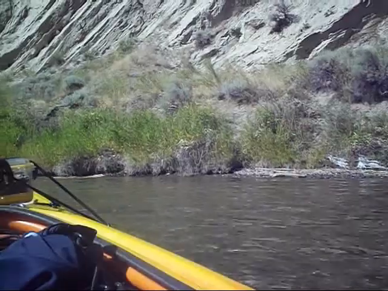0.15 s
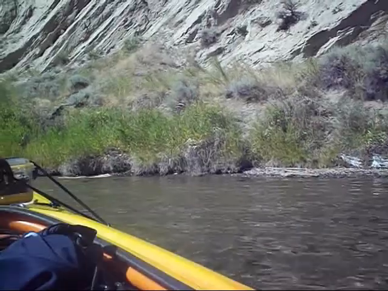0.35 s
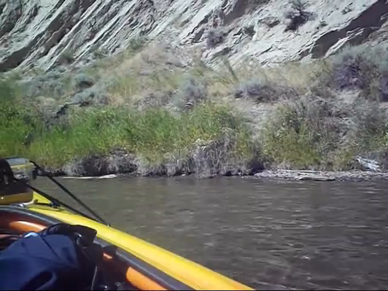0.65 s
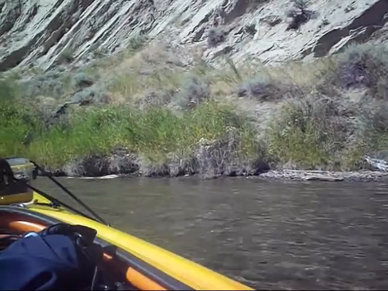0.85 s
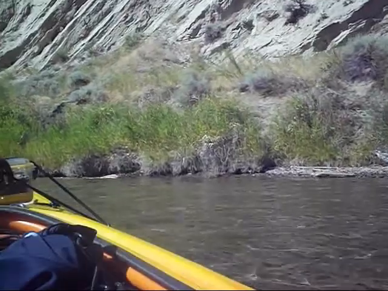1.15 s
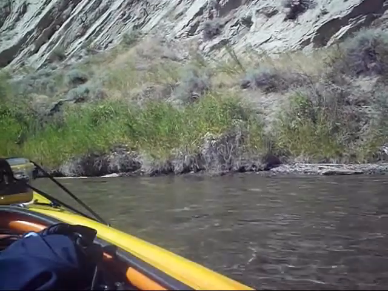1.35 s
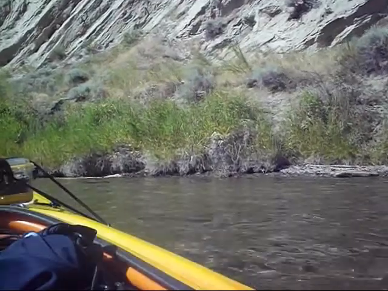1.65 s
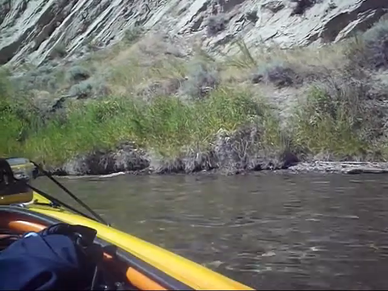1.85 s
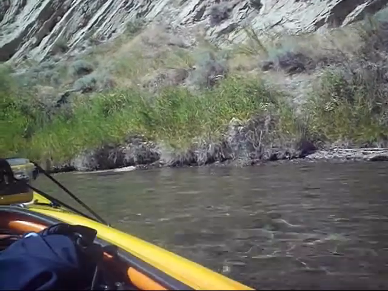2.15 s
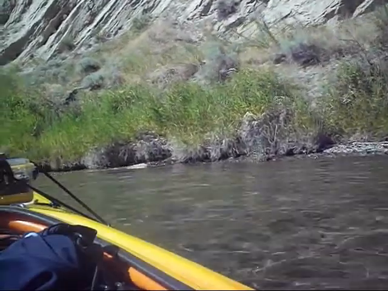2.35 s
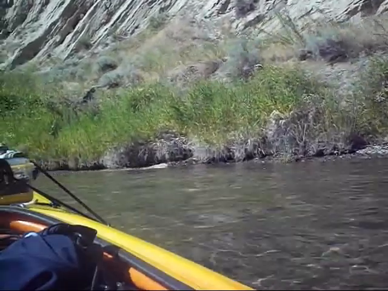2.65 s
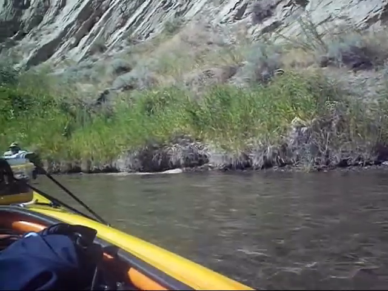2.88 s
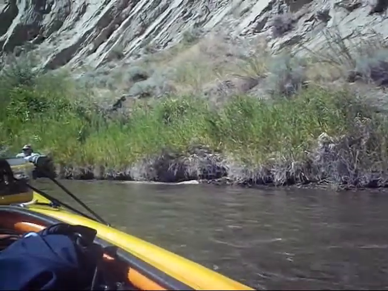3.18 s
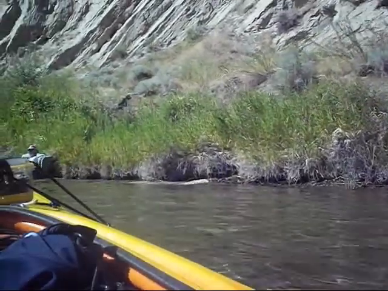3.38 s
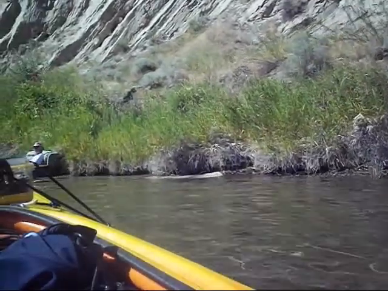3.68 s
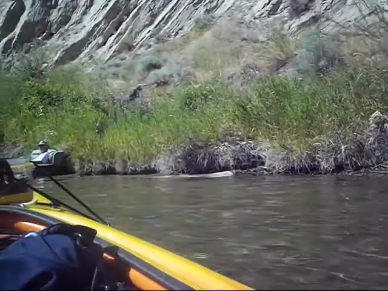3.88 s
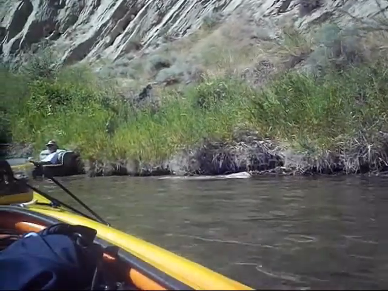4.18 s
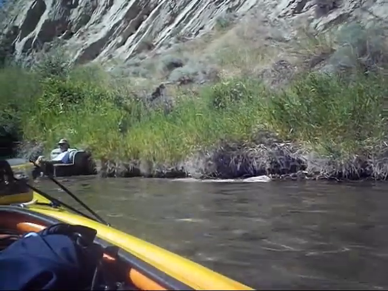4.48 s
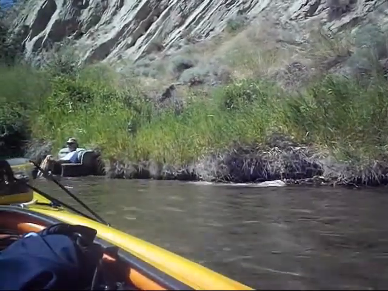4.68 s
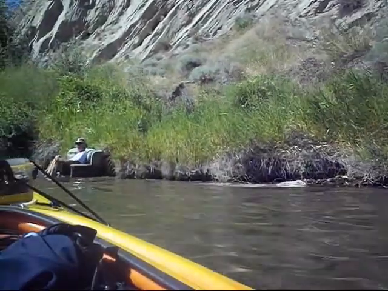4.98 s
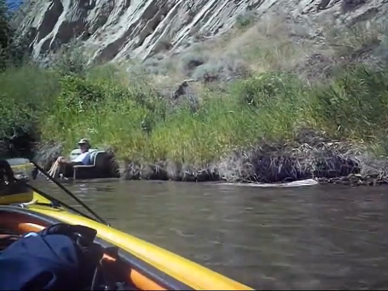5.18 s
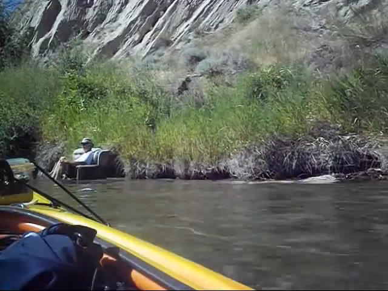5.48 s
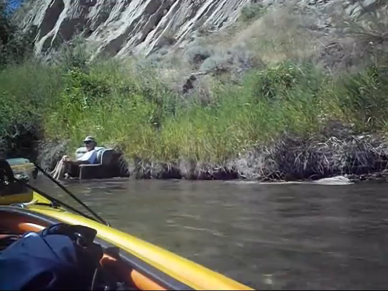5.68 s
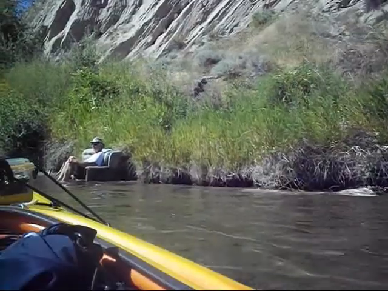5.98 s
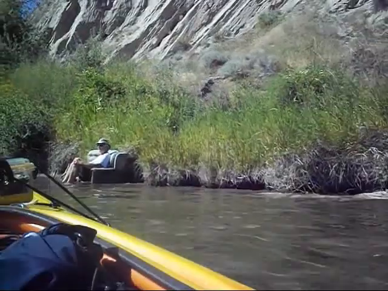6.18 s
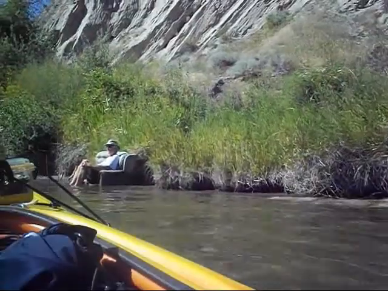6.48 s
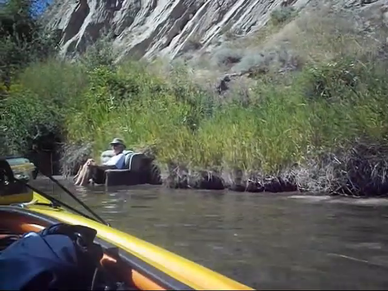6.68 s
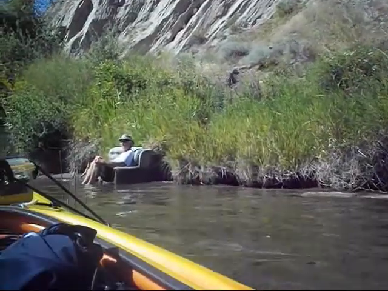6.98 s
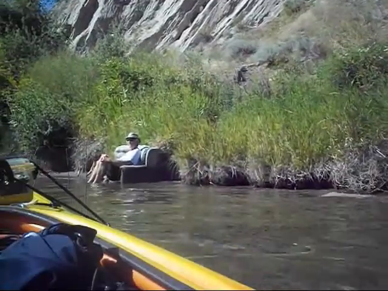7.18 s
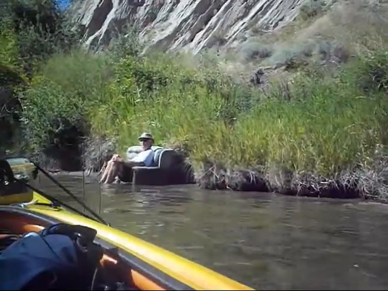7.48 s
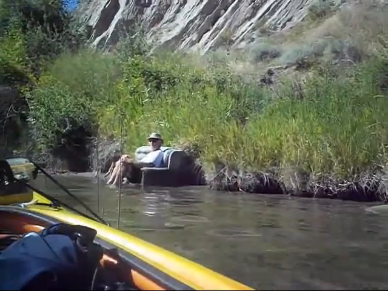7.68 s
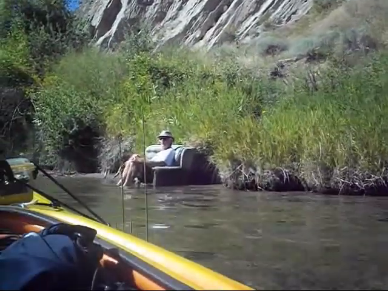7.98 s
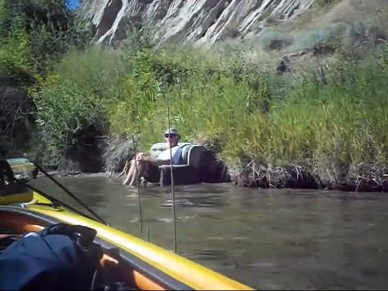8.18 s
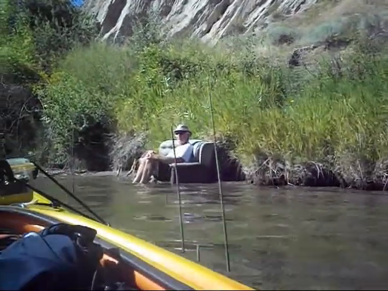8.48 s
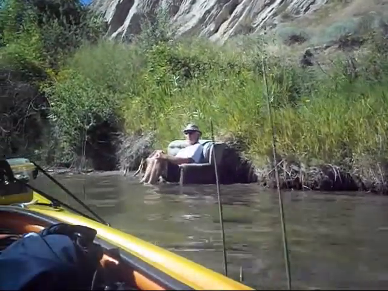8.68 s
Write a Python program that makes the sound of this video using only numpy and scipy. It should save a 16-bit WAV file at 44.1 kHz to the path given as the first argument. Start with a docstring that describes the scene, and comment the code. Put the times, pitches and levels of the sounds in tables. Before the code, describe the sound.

Heard close from the deck of a drifting kayak, fine fizzy trickling and small bubble notes run over light wind rumble. Before the middle comes a single sharp metallic clack with a short ring. Afterwards the water sounds duller, gurgling and knocking in the hollow hull, with the strongest boom shortly before the end. The small microphone catches little treble.

```python
"""Kayak on a calm river

Heard from a small camera on the deck of a drifting kayak. Wind rumbles on the microphone, water
trickles alongside in tiny bubbles, and wavelets slap and boom in the hollow hull underneath. Once a
metal fitting is struck and pings, and the trickle gives way to a duller wash. The camera's sound is
narrow-band; it ticks faintly at first, and later its left channel runs slightly late."""
import sys
import numpy as np
from scipy import signal
from scipy.fft import rfft, irfft, next_fast_len
from scipy.io import wavfile
from scipy.ndimage import uniform_filter1d, map_coordinates

SR = 44100
rng = np.random.default_rng(int(sys.argv[2]) if len(sys.argv) > 2 else 0)


def master_out(mix):
    """Clip the mix to full scale and print it as 16-bit PCM to the path in sys.argv[1]."""
    frames = np.transpose(np.atleast_2d(mix))
    ceiling = np.clip(frames, -1, 1)
    pcm = np.round(ceiling * 32767).astype(np.int16)
    wavfile.write(sys.argv[1], SR, pcm)


N = 390279
TIME = np.arange(N) / SR


def amp(db):
    """Decibels to gain."""
    return 10 ** (np.asarray(db) / 20)


def unit(x):
    """x scaled to rms 1."""
    return x / np.sqrt(np.mean(x ** 2) + 1e-20)


def along(points, hz):
    """Interpolate (Hz, value) points on a log frequency axis."""
    freqs, values = np.transpose(points)
    return np.interp(np.log(hz + 1), np.log(freqs + 1), values)


def curve(points):
    """Interpolate (seconds, value) points at every sample."""
    return np.interp(TIME, *np.transpose(points))


def wobble(rate):
    """A smooth random curve with rate knots a second."""
    return map_coordinates(rng.standard_normal(int(N * rate / SR) + 4), [TIME * rate])


def filtered(x, response):
    """x through a complex frequency response."""
    n = x.shape[-1]
    padded = next_fast_len(n + 8192)
    return irfft(rfft(x, padded) * response(np.fft.rfftfreq(padded, 1 / SR)), padded)[..., :n]


def resonate(x, modes):
    """x through damped resonances of alternating sign."""
    def response(f):
        return sum((-1) ** k * amp(db) * 1j * f * width / (hz * hz - f * f + 1j * f * width)
                   for k, (hz, width, db) in enumerate(modes))
    return filtered(x, response)


def rush(spectrum, patchy_db):
    """Coloured noise of rms 1 with patches of random gain in time and pitch."""
    cells = signal.stft(rng.standard_normal(N), nperseg=512)[2]
    patches = uniform_filter1d(rng.standard_normal(cells.shape), size=5, axis=0)
    patches = unit(uniform_filter1d(patches, size=6, axis=1))
    noise = signal.istft(cells * amp(patchy_db * patches), nperseg=512)[1][:N]
    return unit(filtered(noise, lambda hz: amp(along(spectrum, hz))))


def add(track, start_s, sound):
    """Mix a sound into a track."""
    part = track[max(round(start_s * SR), 0):][:len(sound)]
    part += sound[:len(part)]


def bubble(t, hz, cycles, glide):
    """A bubble swells, rings for some cycles and rises in pitch as it nears the surface."""
    age = t * hz / cycles
    envelope = (1 - np.exp(-4 * age)) * np.exp(-age)
    return envelope * np.sin(2 * np.pi * hz * t * (1 + glide * np.tanh(age / 2)))


def bubbles(count, low_hz, high_hz, cycles, spread_db):
    """A cloud of bubbles of random size, rms 1."""
    when, pitch, size = rng.random((count, 3)).T[:, :, None]
    t = np.arange(SR // 30) / SR
    strength = amp(-spread_db * np.log(1 - .97 * size))
    grains = strength * bubble(t, low_hz * (high_hz / low_hz) ** pitch, cycles, glide=0.069)
    samples = (when * N).astype(int) + np.arange(len(t))
    return unit(np.bincount(samples.ravel(), grains.ravel(), N)[:N])


def slap(modes, contact_s):
    """A brief noisy push rings (Hz, width in Hz, dB) modes; the first 20 ms have rms 1."""
    t = np.arange(SR // 8) / SR
    push = rng.standard_normal(len(t)) * t / contact_s * np.exp(-t / contact_s)
    ring = resonate(push, modes)
    return ring / np.sqrt(np.mean(ring[:SR // 50] ** 2))


# Gusts across the deck. Each row: time in seconds, relative level in dB.
GUST_LEVELS = [(0.0, -60), (0.37, -55.5), (1.21, -62.5), (3.75, -53), (3.87, -58.5), (4.93, -56),
               (5.44, -62), (7.54, -60), (7.84, -56), (8.85, -65.5)]
# Wind at the microphone. Each row: frequency in Hz, relative level in dB.
WIND_SPECTRUM = [(8, -3), (20, 2), (35, 1), (55, -18.5), (120, -29), (400, -54.5)]


def wind(surge_db):
    """Gusts rumble right on the microphone."""
    return amp(curve(GUST_LEVELS) + 4 + surge_db) * rush(WIND_SPECTRUM, patchy_db=0.46)


# The drone below the deck. Each row: frequency in Hz, relative level in dB.
DRONE_SPECTRUM = [(25, -25.5), (45, -4), (65, -1), (105, -6.5), (150, -11.5), (230, -17.5), (400, -25),
                  (900, -43)]


def drone(gain):
    """The current drones low in the hull."""
    return gain * rush(DRONE_SPECTRUM, patchy_db=-0.1)


# Water against the hull. Each row: frequency in Hz, relative level in dB.
WASH_SPECTRUM = [(60, -21.5), (200, -7), (380, -8.5), (510, -9), (590, -5.5), (640, -2), (730, -7.5),
                 (870, -11.5), (1050, -14), (1600, -15.5), (2350, -20.5), (2800, -17.5), (3300, -21.5),
                 (4400, -31.5)]
# Modes of the air in the hull. Each row: frequency in Hz, width in Hz, relative level in dB.
CAVITY_MODES = [(382, 120, -14), (642.5, 31.8, 3), (720, 97, -6.5)]


def wash(gain, stir, hollowness):
    """Water washes along the hull, rings the air inside and gurgles with bubbles."""
    water = gain * amp(.6 * wobble(14)) * rush(WASH_SPECTRUM, patchy_db=2.0)
    hollow = gain * hollowness * amp(-2) * unit(resonate(rng.standard_normal(N), CAVITY_MODES))
    gurgle_gain = np.hypot(amp(-16) * gain, amp(-5.5) * stir)
    gurgle = gurgle_gain * bubbles(count=300, low_hz=590, high_hz=1926, cycles=5, spread_db=3.5)
    return water + hollow + gurgle


# Fizz at the waterline. Each row: frequency in Hz, relative level in dB.
FIZZ_SPECTRUM = [(700, -36.5), (1400, -6), (1900, -3.5), (2250, 0.6), (3000, 0.5), (3500, 3), (4200, -11)]


def trickle(gain):
    """Tiny bubbles fizz and ring close alongside."""
    fizz = amp(2.0 + wobble(16)) * rush(FIZZ_SPECTRUM, patchy_db=3.0)
    notes = amp(-2.5) * bubbles(count=800, low_hz=2047, high_hz=3702, cycles=6.3, spread_db=3.0)
    return gain * (fizz + notes)


# Larger waves reaching the boat. Each row: start in seconds, strength in dB, rumble in dB,
# decay time in seconds.
LARGE_WAVES = [(4.29, -56, -58.5, .27), (5.06, -52, -43, .16), (6.56, -54, -56, .2),
               (7.93, -50.5, -44, .14)]


def churn(rise_s):
    """Gains of the stirred water and the hull's rumble: each wave raises them, then they settle."""
    stir, rumble, t = np.zeros(N), np.zeros(N), np.arange(2 * SR) / SR
    for start_s, db, rumble_db, decay_s in LARGE_WAVES:
        envelope = (1 - np.exp(-t / rise_s)) * np.exp(-t / decay_s)
        add(stir, start_s, amp(db) * envelope)
        add(rumble, start_s, amp(rumble_db) * envelope)
    return stir, rumble


# The trickle alongside while it runs. Each row: time in seconds, relative level in dB.
TRICKLE_LEVELS = [(0.0, -64), (0.29, -65), (0.62, -60.5), (1.38, -64.5), (1.59, -62), (2.16, -63),
                  (2.61, -65), (2.88, -64.5), (3.07, -60), (3.21, -60.5), (3.39, -61.5), (3.5, -63.5)]
DULL_FROM_S, DULL_FADE_S = 3.57, .35  # the trickle gives way to the duller wash


def river():
    """Wind and water around the microphone; some wash and fizz differ between left and right."""
    dullness = np.clip((TIME - DULL_FROM_S) / DULL_FADE_S, 0, 1)

    def fade(before_db, after_db):
        return amp(before_db + (after_db - before_db) * dullness)

    stir, rumble = churn(rise_s=0.015)
    drone_gain = np.hypot(fade(before_db=-57.5, after_db=-55), rumble)
    wash_gain = np.hypot(fade(before_db=-61, after_db=-56), stir)
    trickle_gain = np.hypot(fade(before_db=curve(TRICKLE_LEVELS), after_db=-74), amp(-9) * stir)
    surge_db = 1.1 * wobble(7.8)
    mid = wind(surge_db) + drone(drone_gain * amp(surge_db))
    mid += wash(wash_gain, stir, hollowness=dullness) + trickle(trickle_gain)
    side = wash_gain * amp(-18) * rush(WASH_SPECTRUM, patchy_db=2.5)
    side += trickle_gain * amp(-13) * rush(FIZZ_SPECTRUM, patchy_db=3)
    return np.array([mid + side, mid - side])


# Bubbles nearest the microphone. Each row: start in seconds, level in dB, pitch in Hz,
# relative splash level in dB.
NEAR_BUBBLES = [(0.3031, -44, 2160, -1), (0.4072, -43, 2300, 3), (0.4539, -37.5, 2280, 1.5),
                (0.5185, -45, 2920, -2), (0.7826, -44.5, 3440, 8.5), (0.8845, -41, 3460, 5),
                (1.3074, -44.5, 2540, 4), (1.4394, -43, 2820, -8), (1.5707, -44, 3410, 6),
                (2.0892, -39.5, 3536, 2), (2.2363, -44, 3380, -8), (2.3306, -49.5, 2700, 7),
                (2.5228, -39, 3240, 2), (2.988, -46, 2500, 3), (3.0746, -44, 3000, 1),
                (4.2123, -41.5, 2930, 2), (4.57, -38.5, 2760, -6), (4.8923, -36, 2760, 6),
                (5.219, -39.5, 2420, 7), (5.6347, -38.5, 2820, 6)]


def plips():
    """Single bubbles stand out of the trickle as round notes, each with a tiny splash."""
    out, t = np.zeros(N), np.arange(SR // 8) / SR
    for start_s, db, hz, splash_db in NEAR_BUBBLES:
        splash = amp(splash_db - 20) * slap([(2430, 1700, 0), (3560, 1400, 0)], contact_s=0.0013)
        note = bubble(t, hz, cycles=12, glide=.02)
        add(out, start_s - .001, amp(db) * (note + splash))
    return out


# Air pockets under the boat. Each row: start in seconds, relative level in dB, pitch in Hz.
AIR_POCKETS = [(2.162, -42.5, 740), (2.628, -48, 840), (4.356, -36.5, 479), (4.693, -29.5, 702),
               (5.093, -35.5, 682), (5.106, -30, 690)]


def gulps():
    """Large trapped bubbles ring briefly under the hull."""
    out, t = np.zeros(N), np.arange(SR // 8) / SR
    for start_s, db, hz in AIR_POCKETS:
        add(out, start_s - .001, amp(db + 0.5) * bubble(t, hz, cycles=4.8, glide=0.026))
    return out


# Modes of a metal fitting on the boat, the dead ones first. Each row: frequency in Hz,
# relative level in dB, seconds to fall by 60 dB.
FITTING_MODES = [(495, -37.5, .05), (698, -33.5, .06), (1040, -38, .03), (1150, -41.5, .03),
                 (1640, -20.5, 0.018), (1970, -15.5, 0.013), (2280, -20.5, .009), (2970, -21.5, .009),
                 (1740, -37.5, .33), (2390, -53.5, 0.53), (2638, -22, 0.33)]


def ping(start_s):
    """A hard clack on the fitting, which rings on in a few clear tones."""
    out, t = np.zeros(N), np.arange(SR // 2) / SR
    ring = sum((-1) ** k * amp(db - 60 * t / t60) * np.sin(2 * np.pi * hz * t)
               for k, (hz, db, t60) in enumerate(FITTING_MODES))
    attack = 1 - np.exp(-t / 0.00028)
    clack = slap([(273, 270, -10), (1950, 340, -2.5), (3200, 410, -3.5)], contact_s=0.0013)
    add(out, start_s, amp(2.0) * ring * attack)
    add(out, start_s, amp(-31.0) * clack)
    return out


# Swells passing under the microphone. Each row: start in seconds, peak level of the note in dB,
# final pitch in Hz, rise time in seconds.
SWELLS = [(2.167, -49.5, 101.5, 0.033), (2.504, -45.5, 83.5, 0.011), (3.733, -32.5, 28.2, 0.011),
          (4.667, -39.5, 52, 0.022), (5.039, -35, 78.2, 0.023), (5.086, -35, 64.3, 0.046),
          (5.865, -43.5, 65.4, 0.025), (6.67, -48.5, 66, 0.035), (7.936, -20.8, 85, 0.0079),
          (7.961, -24.5, 60.5, 0.0097), (7.992, -34.5, 88, .014), (8.11, -45, 62, .04)]
# Water heaving against the hull. Each row: frequency in Hz, width in Hz, relative level in dB.
SLOSH_MODES = [(60, 74, 2), (212, 160, -7.5), (374, 66, -7)]


def booms():
    """The whole hull flexes under a swell; its low note sags as the water loads it."""
    out, t = np.zeros(N), np.arange(SR // 2) / SR
    for start_s, db, hz, rise_s in SWELLS:
        sagging_hz = hz * (1 + 0.27 * np.exp(-t / rise_s))
        note = -np.sin(2 * np.pi * np.cumsum(sagging_hz) / SR)
        slosh = amp(-13) * unit(resonate(rng.standard_normal(len(t)), SLOSH_MODES))
        envelope = t / rise_s * np.exp(1 - t / rise_s)
        add(out, start_s, amp(db) * envelope * (note + slosh))
    return out


# Resonances of the hull's plastic skin and of the spray thrown off it.
# Each row: frequency in Hz, width in Hz, relative level in dB.
SKIN_MODES = [(1080, 130, -11.5), (1278, 66, 0), (1608, 110, -1.5), (2100, 170, -12.5)]
SPRAY_MODES = [(2740, 330, 0.62), (3200, 550, -0.55), (4400, 300, 0)]


def wavelet(knock_db, hardness_db):
    """A wavelet knocks the air cavity; the harder it is, the more it smacks the skin and sprays."""
    contact_s = .0027 * 2 ** (hardness_db / 25.5)  # harder wavelets scrape along the skin for longer
    knock = amp(-3.5) * slap(CAVITY_MODES, contact_s)
    smack = amp(-0.5) * slap(SKIN_MODES, contact_s)
    spray = amp(-5.5) * slap(SPRAY_MODES, 1.4 * contact_s)
    return amp(knock_db) * (knock + amp(hardness_db) * (smack + spray))


def ripples(count):
    """A few small wavelets follow each large wave at uneven gaps, ever weaker."""
    out = np.zeros(N)
    for start_s, db, _, decay_s in LARGE_WAVES:
        for age in 1.5 * (np.arange(count) + rng.random(count)) / count:
            add(out, start_s + age * decay_s, np.exp(-age) * wavelet(db + 0.5, hardness_db=-7.5))
    return out


# Wavelets on the hull, just below the microphone. Each row: start in seconds, relative knock level
# in dB, hardness in dB (more hardness, more smack over the knock).
HULL_LAPS = [(0.757, -50.5, -14.5), (2.206, -49, -19), (2.522, -52.5, -14), (3.085, -49, -13),
             (4.28, -41, -2), (4.288, -45, -0.5), (4.69, -42, -19), (4.839, -49, -11), (4.938, -49.5, -3.5),
             (5.071, -47, -10.5), (5.128, -54, -2.5), (5.218, -51, -8), (6.557, -50, -4.5),
             (6.569, -39, -10.5), (6.602, -45, -19), (6.611, -40, -23), (6.715, -51.5, -4.5),
             (6.819, -57.5, 0.5), (7.29, -51, 11), (7.369, -45.5, -16), (7.626, -52.5, -3),
             (7.933, -30.5, -18), (7.943, -37.5, -6), (7.963, -45.5, -8), (7.98, -39.5, -1.5),
             (8.033, -44.5, -11), (8.219, -44, -20)]


def laps():
    """Wavelets slap the hull one by one."""
    out = np.zeros(N)
    for start_s, knock_db, hardness_db in HULL_LAPS:
        add(out, start_s - .0015, wavelet(knock_db, hardness_db))
    return out


def scene():
    """Everything reaches the microphone on deck; only the surrounding water has a little width."""
    return river() + plips() + gulps() + laps() + ripples(count=6) + booms() + ping(start_s=3.55633)


BLOCK_S, SLIP_S = 1 / 32, .000148  # the camera's clock gains SLIP_S in each block
SETTLE_S, LEFT_LAG_S = 3.81, .000128  # when the clock settles, and the left channel's lag from then on


def clock_slip(x, abrupt_share, loud_db):
    """Timing error in seconds of a fast clock that jumps back after each block."""
    block = (TIME + .0015) / BLOCK_S
    abrupt = SLIP_S * (block % 1) * (TIME < SETTLE_S)
    eased = uniform_filter1d(uniform_filter1d(abrupt, size=40), size=40)
    # Eased jumps are silent; a random share, and all those in loud sound, stay abrupt and tick.
    by_chance = rng.random(int(block[-1]) + 2)[np.round(block).astype(int)] < abrupt_share
    loud = uniform_filter1d(np.abs(np.gradient(x)), size=400) > amp(loud_db)
    return np.where(by_chance | loud, abrupt, eased)


# The deck camera's upper band edge. Each row: frequency in Hz, gain in dB.
CAMERA_BAND = [(3550, 0), (3750, -2), (3950, -12), (4200, -19.5), (4700, -21), (5300, -62)]
# A faint, flickering high hiss. Each row: frequency in Hz, relative level in dB.
HISS_SPECTRUM = [(3500, -20.5), (4500, 0.5), (7000, -3.5), (12500, -9.5)]
TOP_HZ = 13000


def record(dry):
    """The narrow-band camera ticks until its clock settles, with a faint high hiss flickering over
    that stretch; then the left channel lags."""
    narrow = filtered(dry, lambda hz: amp(along(CAMERA_BAND, hz)))
    slip_s = clock_slip(narrow[0], abrupt_share=.55, loud_db=-63)
    lag_s = LEFT_LAG_S * np.clip((TIME - SETTLE_S) / .05, 0, 1)
    left = map_coordinates(narrow[0], [(TIME + slip_s - lag_s) * SR])
    right = map_coordinates(narrow[1], [(TIME + slip_s) * SR])
    flicker_db = 4.5 * np.tanh(2 * wobble(9))
    hiss = amp(-93 + flicker_db) * rush(HISS_SPECTRUM, patchy_db=2.5) * (TIME < SETTLE_S)
    return filtered(np.array([left, right]) + hiss, lambda hz: np.clip((TOP_HZ - hz) / 400, 0, 1))


dry = scene()
out = record(dry)
master_out(out)
```